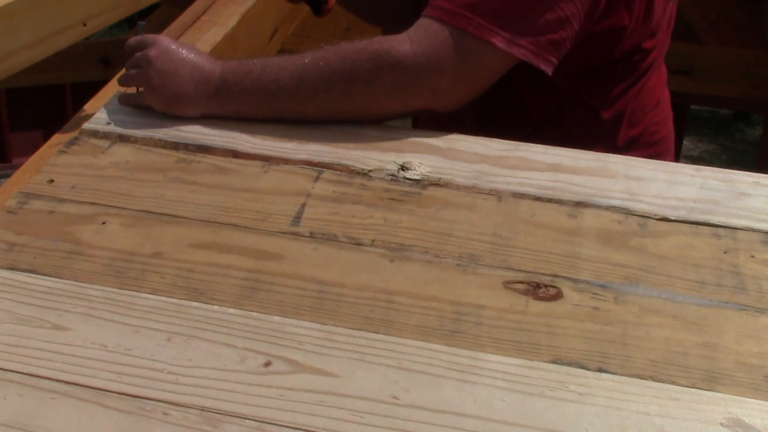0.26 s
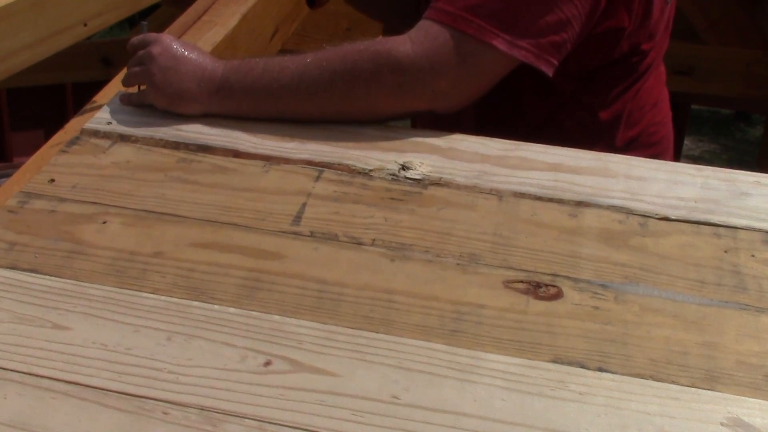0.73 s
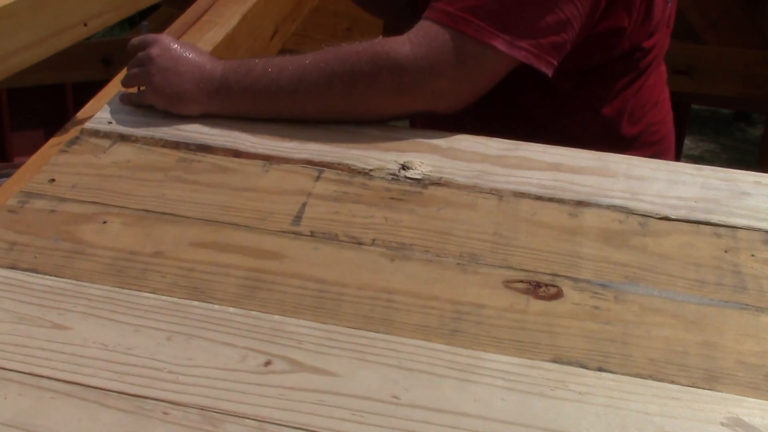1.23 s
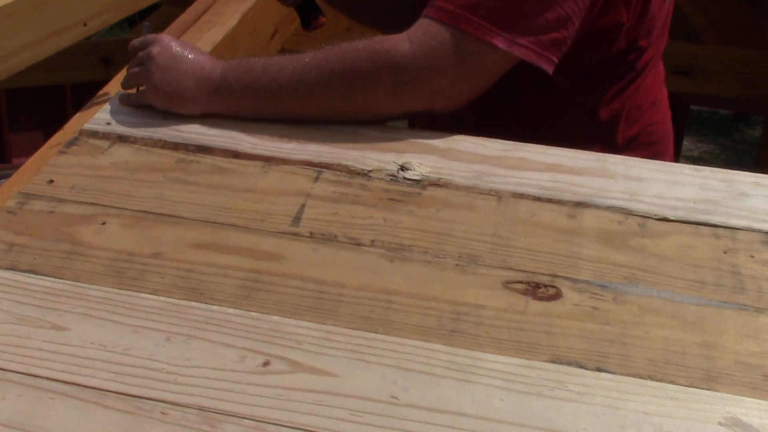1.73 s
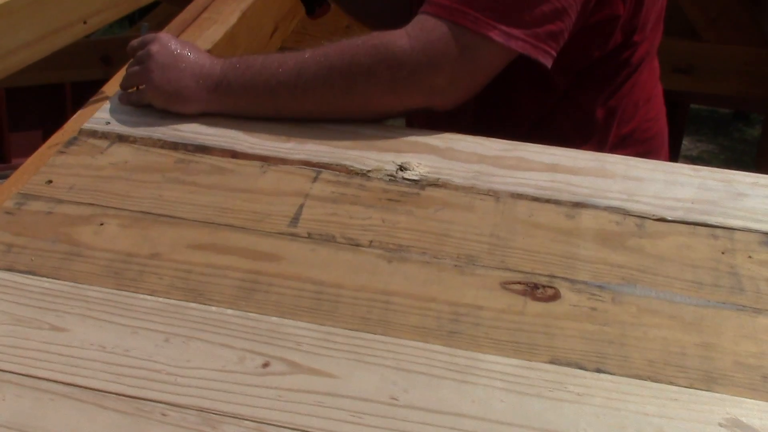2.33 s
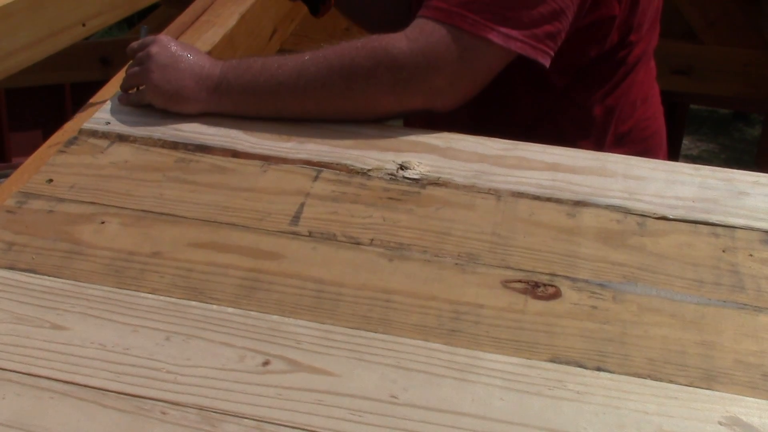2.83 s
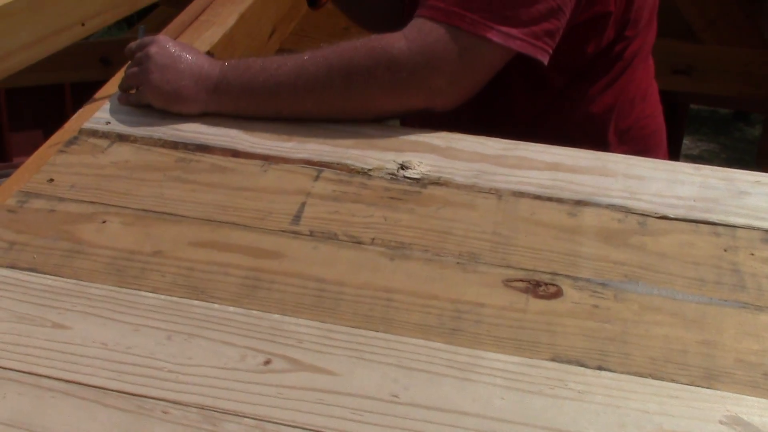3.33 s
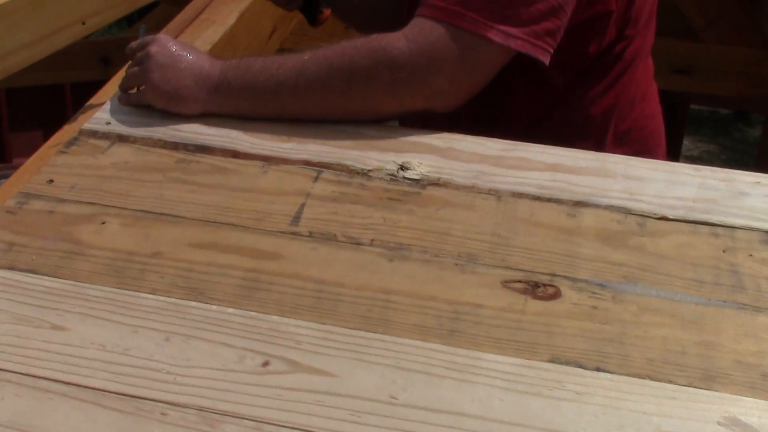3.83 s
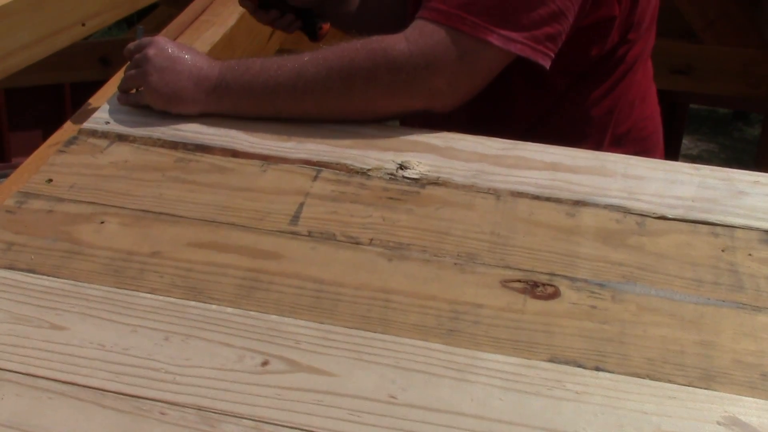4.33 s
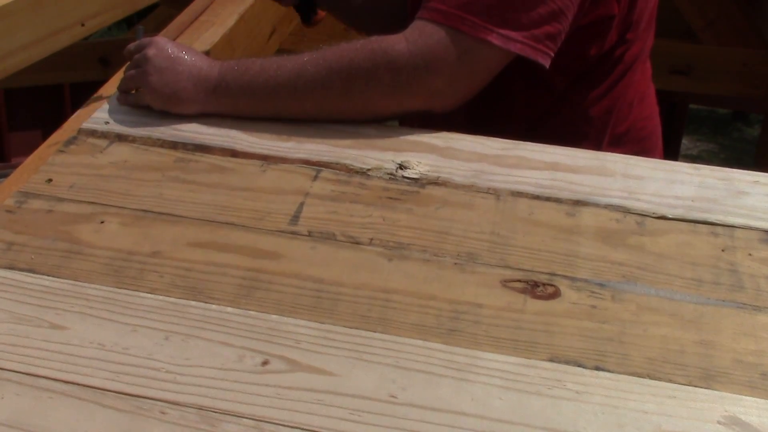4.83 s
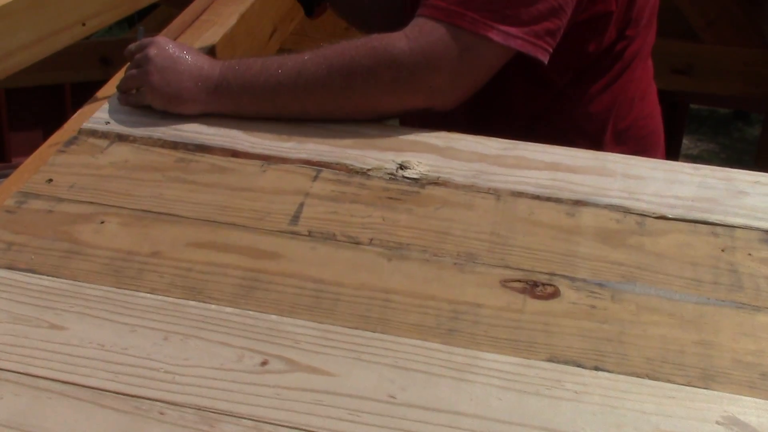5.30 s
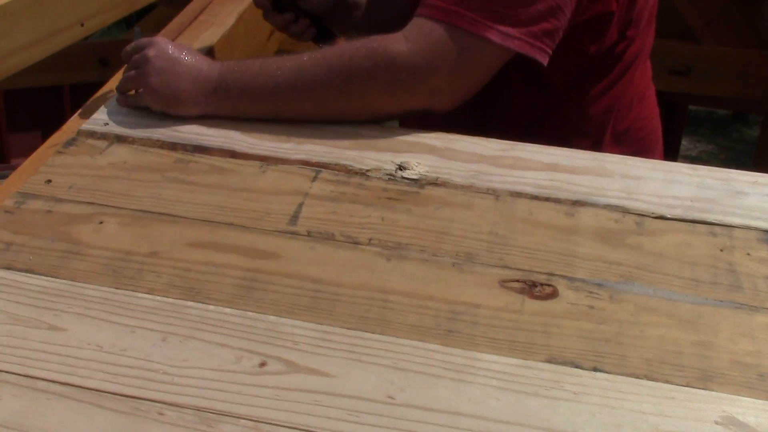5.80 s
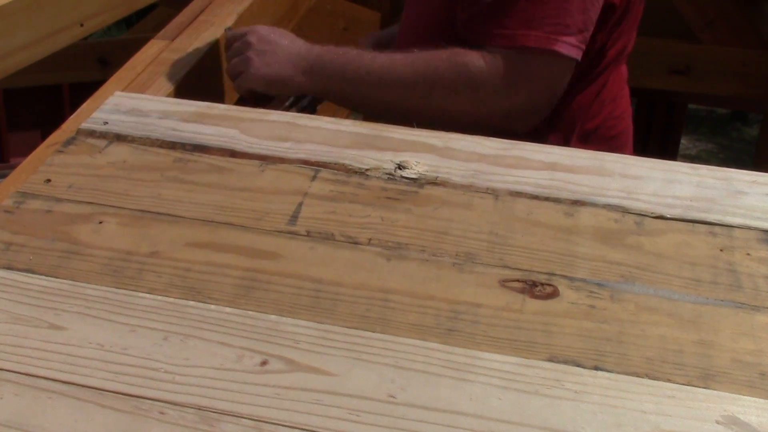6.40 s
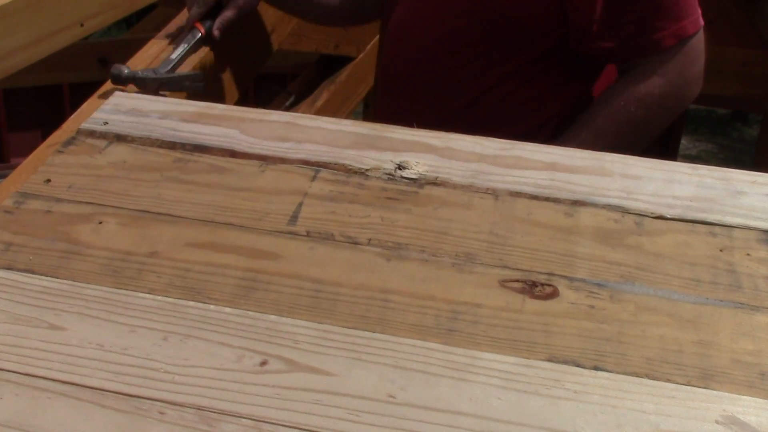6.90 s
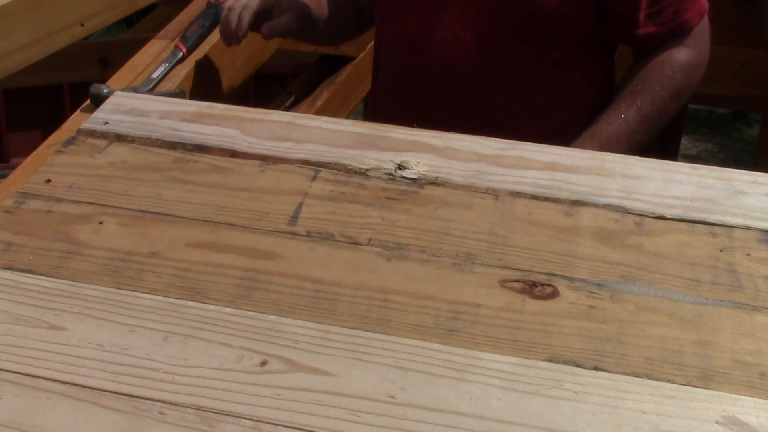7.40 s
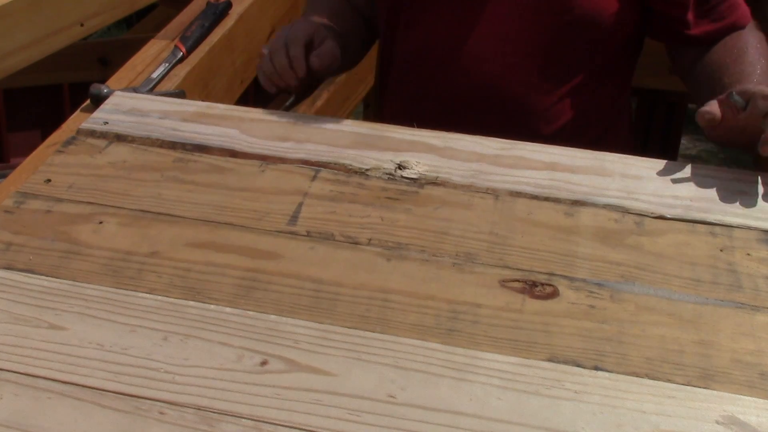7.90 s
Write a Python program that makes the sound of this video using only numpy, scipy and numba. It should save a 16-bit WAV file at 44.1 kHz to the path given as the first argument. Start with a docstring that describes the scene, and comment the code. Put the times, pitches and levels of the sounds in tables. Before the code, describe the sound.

Close stereo microphone on a building site. Loud, dry hammer blows hit nails in timber, each a splintery crack followed by short woody resonance and scattered outdoor reflections, some with a high ring that wavers. The blows come irregularly, fading in force through six seconds. Dull wind, distant traffic and cicadas lie far beneath, thinning to near quiet. Soft wooden clunks follow as the tool is put down, with small rising bird whistles.

```python
"""On a roof outdoors, a steel hammer drives nails into the decking at arm's length.
Each blow excites short board modes, a broadband crack, a longer deck boom, scattered reflections and
the ringing hammer head, which beats against its own reflection as it lifts. Soft knocks end with the
hammer being laid down. Cicadas are filtered noise that throbs, then buzzes evenly; a songbird is gliding
sines; wind and far traffic are dull noise. A limiter dips the level after the blows, and peaks clip."""
import sys
import numpy as np
from scipy import signal
from scipy.fft import rfft, irfft
from scipy.io import wavfile
from numba import njit

SR = 44100
rng = np.random.default_rng(int(sys.argv[2]) if len(sys.argv) > 2 else 0)


def digitize_waveform(pressure):
    """Quantize a signal to 16-bit integers and store it at the path in sys.argv[1].

    Rows of a 2-D input are taken as channels; values are limited to [-1, 1].
    """
    field = np.atleast_2d(pressure).T
    bounded = np.clip(field, -1, 1)
    quanta = np.round(bounded * 32767).astype(np.int16)
    wavfile.write(sys.argv[1], SR, quanta)


N = 359415
TIME = np.arange(N) / SR
AGE = np.arange(SR) / SR  # the second that follows a blow

# Blows on the nail; boom and rings are relative to the force.
# t/s, force/dB, deck boom/dB, low ring/dB, high ring/dB, face height/m, lift speed/(m/s), reflected share/1
BLOWS = [(-0.064, 17.5, 0.5, 2.5, 0.5, .026, 0.23, .52), (0.8906, 18, -.5, 2.5, -6, .024, .26, 0.58),
         (1.51, 19.5, -0.5, 0.5, 2, 0.02, 0.26, 0.47), (1.8439, 15, 0, -1.5, -1, 0.011, 0.35, .5),
         (2.1686, 14, -10, -5, -12.5, 0.0076, .31, 0.7), (3.0564, 10, -2, -10, -19.5, 0.019, 0.21, 0.53),
         (3.6494, 6.5, -1, -11, -1, .023, .14, .9), (5.0515, 1.5, 0.5, -4.5, 5, .019, .24, .08),
         (5.671, -3.5, -5, 1.5, 1, .020, 0.29, 0.16)]
# Light knocks on the boards: t/s, level/dB, high-pass f/Hz, low-pass f/Hz, deck boom/dB
KNOCKS = [(0.282, -25.5, 1190, 2980, -17.5), (2.493, -31.5, 900, 1900, -27.5),
          (4.7285, -16.5, 90, 4860, 1.5), (6.9645, -39.5, 260, 1500, 8), (6.9875, -41, 294, 1600, -14),
          (7.024, -52, 251, 1100, -5), (7.062, -49, 251, 1000, -3.5), (7.812, -35, 1112, 1300, 0)]
# Modes of the board under the nail: f/Hz, level/dB, t60/s
BOARD_MODES = [(466, -6.5, 0.051), (730, -11.5, 0.014), (1200, -3.5, 0.018), (1352, -4.5, 0.017),
               (1779, 1, 0.019), (2432, -3.5, 0.016), (2690, 2.5, .012), (3089, 2, .014),
               (3750, -5, 0.0097), (4470, -4.5, .008), (7060, -12.5, 0.008), (8830, -13, 0.011)]
# Modes of the deck and its rafters: f/Hz, level/dB, t60/s
DECK_MODES = [(119, -27, 0.44), (166.7, -22.5, .42), (212, -17.5, 0.5), (245, -12, 0.45),
              (316.4, -2.5, 0.21), (357, -11, 0.22), (384.5, -11, .3), (414, -8, 0.32), (442, -6, .4),
              (491, -10.5, 0.58), (528, 1.5, 0.16), (579, -10.5, .4), (611, -8.5, 0.29), (641, -15.5, 0.39),
              (698, -12, 0.22), (721, -8, 0.15), (782, -14.5, .35), (914, -17.5, .42), (1038, -11.5, 0.22),
              (1143, -16, 0.27), (1315, -14, 0.15), (1445, -18.5, 0.11)]
# Modes of the hammer head: f/Hz, level/dB, t60/s
HEAD_MODES = [(5122, -23, .45), (6873, -26, .24)]
# Spectrum of the splintery contact crack: f/Hz, level/dB per Hz
CRACK_SPECTRUM = [(30, -20), (150, -13.5), (450, 4), (850, -8.5), (1750, 1.5), (2150, -8), (2900, -2),
                  (3400, -3.5), (5000, -10), (9000, -10), (15000, -22)]
# Scatter from the framing and the yard: f/Hz, level/dB per Hz, t60/s
ECHO_SPECTRUM = [(40, -36.5, .5), (100, -30, .55), (216, -9.5, 0.49), (470, -3, .6), (670, -9, 0.53),
                 (933, -14, 0.68), (1200, -9, 0.21), (1970, -11.5, 0.64), (2780, -11.5, .55),
                 (4340, -18, .42), (7958, -13, 0.22), (11000, -20.5, .3), (16000, -38, .28)]
# Spectrum of the throbbing cicadas: f/Hz, level/dB per Hz
THROB_SPECTRUM = [(100, -63.5), (1000, -34), (1900, -14), (2500, -0.5), (4200, 1.5), (5800, -3), (7500, -1),
                  (8700, -5), (9600, -9.5), (11000, -9.5), (12000, -22.5), (16000, -23)]
# Spectrum of the even buzz, with sharper body resonances: f/Hz, level/dB per Hz
BUZZ_SPECTRUM = [(100, -64), (800, -37.5), (1300, -18.5), (1900, -13), (2700, -1.5), (3500, -4),
                 (4200, -2.5), (4750, -4.5), (5150, -3), (5900, -9), (7200, -4.5), (8700, -7.5),
                 (9400, -12), (11000, -14.5), (12000, -22.5), (16000, -23.5)]
# Throbbing phrases: t/s, throb depth/dB
PHRASES = [(-0.567, 2), (0.74, 1.2), (2.57, 3.5)]
# Level of the sound from the trees, cicadas and bird alike: t/s, level/dB
TREES_LEVEL = [(0.4, -43), (0.8, -42.9), (1.45, -45), (1.79, -44.5), (2.12, -52), (2.55, -52), (3.0, -39),
               (3.33, -47), (3.6, -40), (3.9, -51.5), (4.15, -48), (4.98, -54), (5.45, -60), (6.45, -68),
               (7.1, -66.5), (7.69, -60)]
# Rising whistle, from its own start: t/s, f/Hz, level/dB
UPSLUR = [(0, 1850, -37), (.03, 1810, -11), (.065, 1880, -17.5), (.09, 2250, -4), (.115, 2480, 3),
          (.135, 2520, -8.5), (.17, 2500, -37.5)]
# Falling whistle, from its own start: t/s, f/Hz, level/dB
DOWNSLUR = [(0, 6200, -12), (.06, 5600, -7.5), (.11, 4850, -0.5), (.165, 4500, -0.5), (.185, 4400, -35.5),
            (.2, 3550, -28.5), (.22, 3400, -6), (.26, 3330, 0), (.29, 3300, -27.5)]
# Starts of the rising whistles: t/s
UPSLUR_STARTS = [1.165, 7.089, 7.335, 7.575, 7.813]
# Falling whistles, relative to the trees' level: t/s, level/dB
DOWNSLUR_CALLS = [(.738, 0.5), (5.93, -5), (6.685, 1.5)]
# Spectrum of wind and far traffic: f/Hz, level/dB per Hz
AIR_SPECTRUM = [(30, -15.5), (150, -14), (350, -1.5), (520, 0.5), (800, -5.5), (1100, -5), (1400, -5),
                (2000, -3), (5000, -18.5), (16000, -21.5)]
# Level of wind and far traffic: t/s, level/dB
AIR_LEVEL = [(0.7, -52), (1.45, -51), (2.9, -56), (4.5, -68), (5.6, -72.5), (6.4, -86.5), (7.55, -82)]

# The whole background comes back abruptly.
RETURN_S, RETURN_RISE_S, TREES_RETURN_DB, AIR_RETURN_DB = 7.735, 0.0093, 13, 14
# Every phrase starts with a fast throb and settles to a slow one.
THROB_FAST_HZ, THROB_SLOW_HZ, THROB_SETTLE_S = 43.2, 23, 0.56
BUZZ_START_S, BUZZ_RISE_S = 4.05, 0.018
SOUND_SPEED_M_PER_S = 343


def hammering():
    """Superposition: each contact sums the responses of board, deck, surroundings and head."""
    out = np.zeros((2, N))
    for start_s, force_db, boom_db, low_db, high_db, height_m, lift_m_per_s, share in BLOWS:
        # The harder the blow, the smaller the share of its crack.
        timber = impact(crack_db=2.5 - 0.5 * force_db) + boom(boom_db - 27) + echo(-30)
        ring = head_ring((low_db, high_db), height_m, lift_m_per_s, share)
        add(out, start_s, undb(force_db) * (timber + ring))
    for start_s, level_db, low_hz, bright_hz, boom_db in KNOCKS:
        timber = impact(crack_db=-6) + boom(boom_db - 27) + echo(boom_db - 31.5)
        knock = timber + head_ring((-4, -12), height_m=0, lift_m_per_s=0, share=0)
        # A light touch leaves out the bass, a soft one the treble.
        knock = signal.sosfilt(butter(low_hz, "high", order=3), knock)
        knock = signal.sosfilt(butter(bright_hz, "low", order=4), knock)
        add(out, start_s, undb(level_db) * knock)
    return out * lean_left(2.5)


def impact(crack_db, contact_s=0.00044):
    """Contact excitation: short board modes and a noise crack build up while the face presses home."""
    board = wood(BOARD_MODES, detune=0.012, scatter_db=1.2, spread=0.2, stagger=0.2)
    crack = decay(0.015) * noise(CRACK_SPECTRUM, SR, width=0.2)
    press = 1 - np.exp(-(AGE / contact_s) ** 2)
    return (board + undb(crack_db) * crack) * press


def boom(level_db):
    """Structure-borne resonance: the deck's lightly damped modes build up and outlast the board."""
    deck = wood(DECK_MODES, detune=0.003, scatter_db=2, spread=0.28, stagger=0.9)
    return undb(level_db) * deck * (1 - decay(0.02))


def wood(modes, detune, scatter_db, spread, stagger):
    """Modal synthesis: damped sines vary from blow to blow in pitch, level and phase, also between ears."""
    out = np.zeros((2, SR))
    ears = np.array([[1], [-1]])
    for k, (hz, level_db, t60) in enumerate(modes):
        tune, size, skew, start = rng.standard_normal(4)
        n = min(int(1.5 * t60 * SR), SR)  # stops 90 dB down
        phase = 2 * np.pi * hz * (1 + detune * tune) * AGE[:n]
        phase = phase + stagger * start + spread * skew * ears
        gain = (-1) ** k * undb(level_db + scatter_db * size)  # neighbouring modes alternate in sign
        out[:, :n] += gain * decay(t60)[:n] * np.sin(phase)
    return out


def echo(level_db):
    """Diffuse reflection: dense noise in octave bands, each of which decays at its own rate."""
    spectrum = rfft(noise(ECHO_SPECTRUM, SR, width=0.42))
    octave = np.log2(np.arange(spectrum.shape[1]) + 1)  # bins are 1 Hz apart
    out = 0
    for centre in np.arange(5, 15):
        weight = np.maximum(1 - abs(octave - centre), 0)
        band = irfft(spectrum * weight, SR)
        out = out + band * decay(at_hz(ECHO_SPECTRUM, 2.0 ** centre, axis=2))
    return undb(level_db) * out * (1 - decay(0.013))


def head_ring(ring_dbs, height_m, lift_m_per_s, share, reach_m=0.34, spread=0.067):
    """Interference: the lifting head's direct ring beats against a weakening reflection off the deck."""
    gap_m = height_m + lift_m_per_s * AGE
    delay_s = 2 * gap_m / SOUND_SPEED_M_PER_S
    reflection = min(share, 1) * np.exp(-(gap_m / reach_m) ** 2)
    out = 0
    for (hz, level_db, t60), ring_db in zip(HEAD_MODES, ring_dbs):
        phase = 2 * np.pi * hz * AGE + spread * np.array([[-1], [1]])
        direct = np.sin(phase)
        reflected = reflection * np.sin(phase - 2 * np.pi * hz * delay_s)
        out = out + undb(level_db + ring_db) * decay(t60) * (direct + reflected)
    return out


def cicadas(width=0.88):
    """Amplitude modulation: a broad sizzle to the left throbs, then gives way to an even buzz."""
    throb = noise(THROB_SPECTRUM, N, width) * undb(1 + throb_db())
    buzz = noise(BUZZ_SPECTRUM, N, width) * undb(1)
    even = np.clip((TIME - BUZZ_START_S) / BUZZ_RISE_S, 0, 1)
    # Square roots keep the power constant through the crossfade.
    return (np.sqrt(1 - even) * throb + np.sqrt(even) * buzz) * lean_left(4)


def throb_db():
    """Frequency gliding: the level swings sinusoidally, fast at each phrase's start, then slower."""
    swing = np.zeros(N)
    for start_s, depth_db in PHRASES:
        age = np.arange(N - int(start_s * SR)) / SR
        settling = np.exp(-(age / THROB_SETTLE_S) ** 2)
        rate_hz = THROB_SLOW_HZ + (THROB_FAST_HZ - THROB_SLOW_HZ) * settling
        cycle = np.interp(TIME - start_s, age, np.cumsum(rate_hz) / SR)
        swing = np.where(TIME >= start_s, depth_db * np.cos(2 * np.pi * cycle), swing)
    return swing


def songbird(trees_db=-8, trees_t60=0.35):
    """Phase integration: gliding pure tones are whistled, then smeared by the trees' decaying scatter."""
    out = np.zeros((2, N))
    calls = [(UPSLUR, start_s, 5) for start_s in UPSLUR_STARTS]  # all at 5 dB over the trees' level
    calls += [(DOWNSLUR, start_s, level_db) for start_s, level_db in DOWNSLUR_CALLS]
    for shape, start_s, level_db in calls:
        t = AGE[AGE < shape[-1][0]]
        hz = curve(shape, t) * (1 + 0.0084 * rng.standard_normal())  # pitch varies from call to call
        whistle = np.sin(2 * np.pi * np.cumsum(hz) / SR)
        gain = undb(level_db + curve(shape, t, axis=2))
        add(out, start_s, (gain * whistle)[None])
    scatter = rng.standard_normal((2, SR)) * decay(trees_t60)
    scatter = scatter / np.linalg.norm(scatter[0])
    return out + undb(trees_db) * signal.fftconvolve(out, scatter, axes=1)[:, :N]


def air():
    """Random superposition: wind and far traffic merge into dull stereo noise."""
    return noise(AIR_SPECTRUM, N, width=0.45) * background_gain(AIR_LEVEL, AIR_RETURN_DB)


def background_gain(levels, return_db):
    """Level envelope: the background follows its curve, then steps back up."""
    step = np.clip((TIME - RETURN_S) / RETURN_RISE_S, 0, 1)
    return undb(curve(levels, TIME) + return_db * step)


def noise(spectrum, size, width):
    """Spectral shaping: white noise is coloured to stereo of rms 1; width is side over mid."""
    gain = undb(at_hz(spectrum, np.fft.rfftfreq(size, 1 / SR)))
    mid, side = irfft(rfft(rng.standard_normal((2, size))) * gain, size)
    pair = np.array([mid + width * side, mid - width * side])
    return pair / pair.std()


def decay(t60):
    """Exponential damping: the level falls 60 dB in t60 seconds."""
    return np.exp(-np.log(1000) * AGE / t60)


def undb(db):
    """Logarithmic level: decibels to amplitude gain."""
    return 10 ** (np.asarray(db) / 20)


def lean_left(db):
    """Interaural level difference: the left ear is db louder than the right."""
    return undb(np.array([[db], [-db]]) / 2)


def curve(rows, t, axis=1):
    """Linear interpolation: one column of a table against its first."""
    rows = np.array(rows)
    return np.interp(t, rows[:, 0], rows[:, axis])


def at_hz(rows, hz, axis=1):
    """Logarithmic frequency: one column of a spectrum, interpolated over log f."""
    rows = np.array(rows)
    return np.interp(np.log(hz + 1), np.log(rows[:, 0]), rows[:, axis])


def butter(hz, kind, order):
    """Band limiting: a maximally flat high-pass or low-pass filter."""
    return signal.butter(order, min(hz, SR / 3), kind, fs=SR, output="sos")


def add(out, start_s, sound):
    """Linear superposition: a sound is mixed in from start_s."""
    start = int(round(start_s * SR))
    lo, hi = max(start, 0), min(start + sound.shape[1], N)
    out[:, lo:hi] += sound[:, lo - start:hi - start]


def scene():
    """Superposition of sources: hammering in front of trees and air."""
    trees = (cicadas() + songbird()) * background_gain(TREES_LEVEL, TREES_RETURN_DB)
    return hammering() + trees + air()


@njit
def duck(over_db, attack, release):
    """Dynamic compression: the cut in dB chases any excess quickly and lets go at a steady rate."""
    out, cut = np.empty(len(over_db)), 0.0
    for i in range(len(over_db)):
        if over_db[i] > cut:
            cut += (over_db[i] - cut) * attack
        else:
            cut = max(cut - release, 0.0)
        out[i] = cut
    return out


def record(dry, threshold_db=1, attack_s=0.0011, release_db_per_s=300, top_hz=15900):
    """Limiting: loud blows are ducked, peaks that outrun the attack clip, and the top is cut."""
    over_db = 20 * np.log10(abs(dry).max(axis=0) + 1e-9) - threshold_db
    cut_db = duck(over_db, 1 / (attack_s * SR), release_db_per_s / SR)
    clipped = np.clip(dry * undb(-cut_db), -1, 1)
    # Steep low-pass: 0.2 dB ripple, 70 dB rejection.
    low_pass = signal.ellip(8, 0.2, 70, top_hz, fs=SR, output="sos")
    return np.clip(signal.sosfilt(low_pass, clipped), -1, 1)


dry = scene()
out = record(dry)
digitize_waveform(out)
```